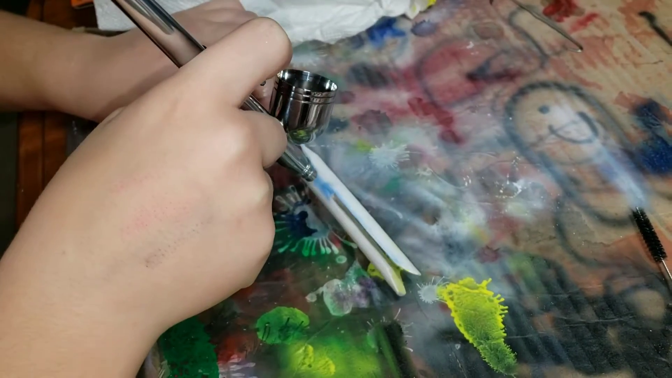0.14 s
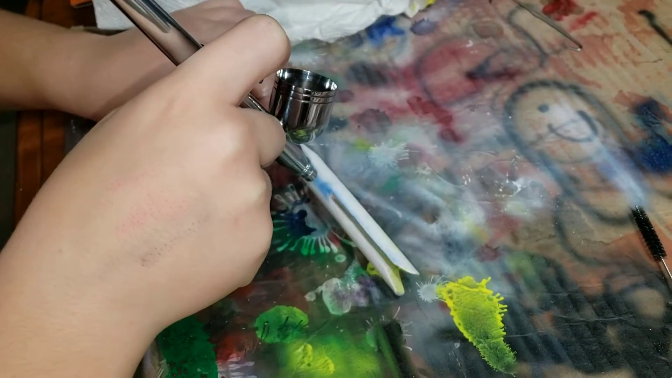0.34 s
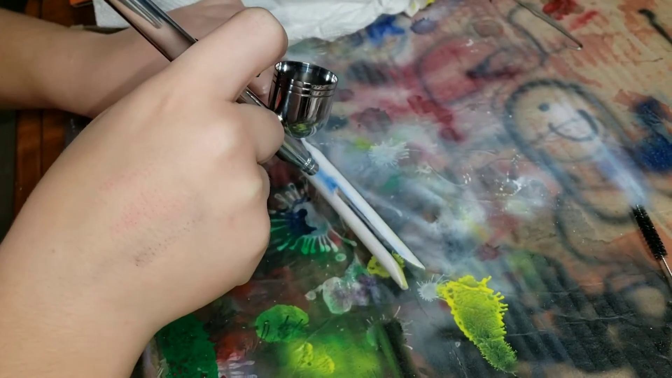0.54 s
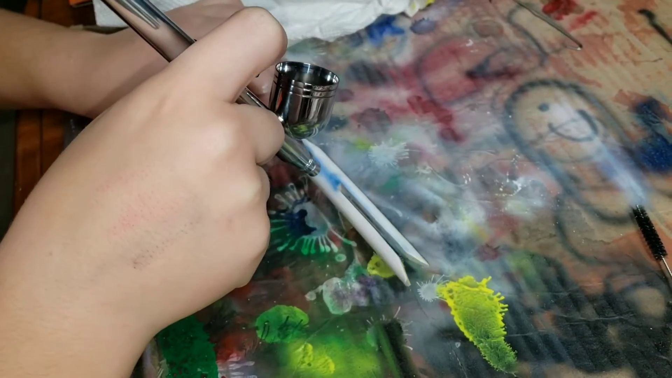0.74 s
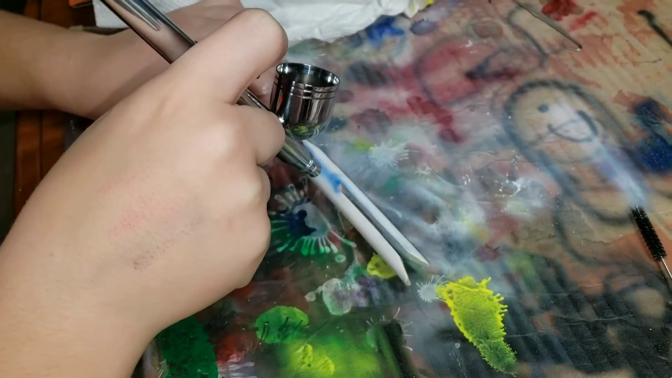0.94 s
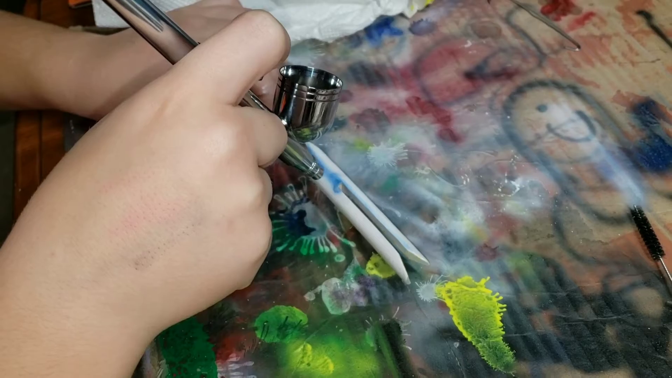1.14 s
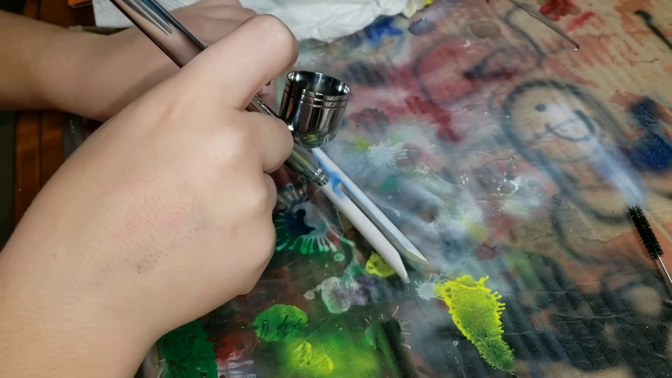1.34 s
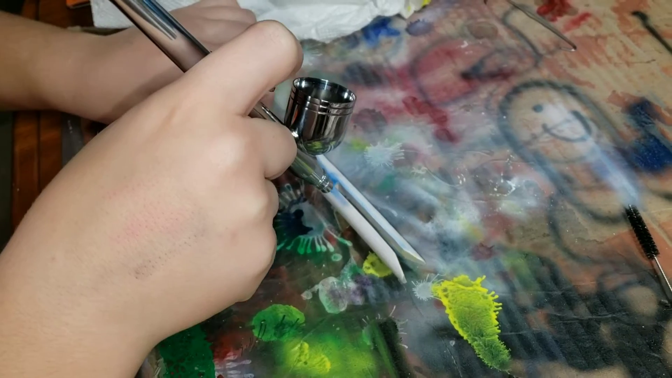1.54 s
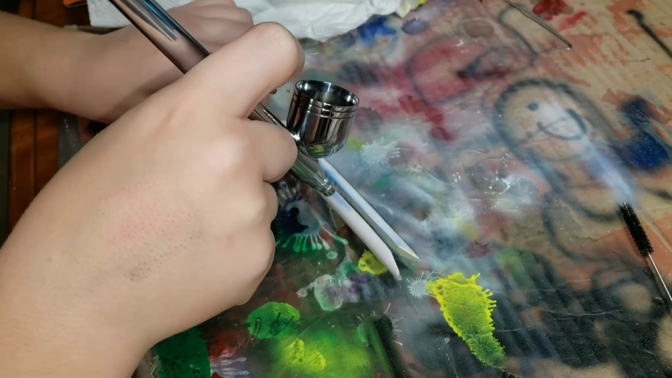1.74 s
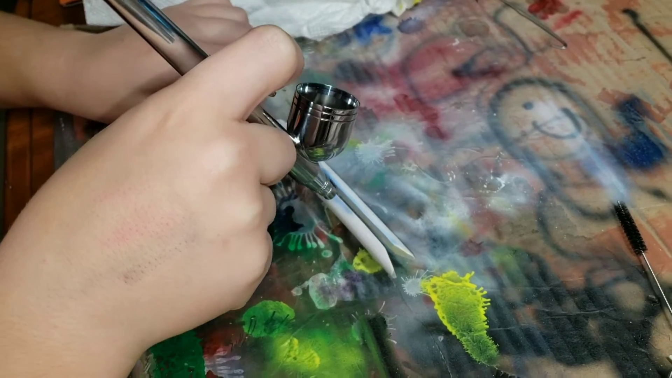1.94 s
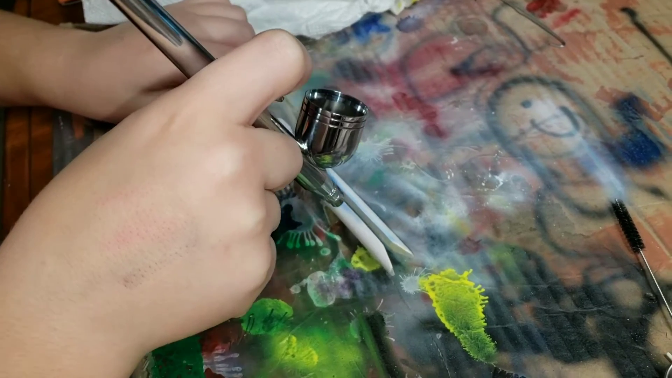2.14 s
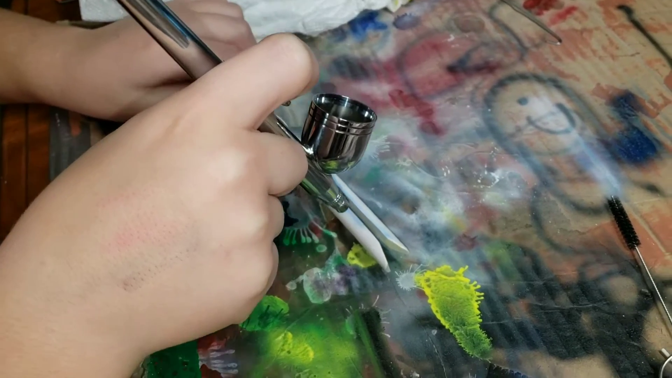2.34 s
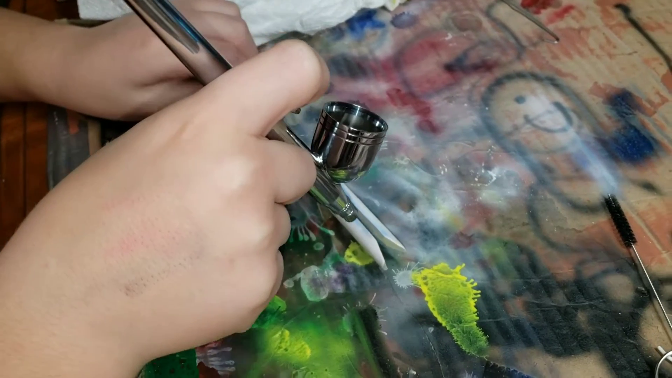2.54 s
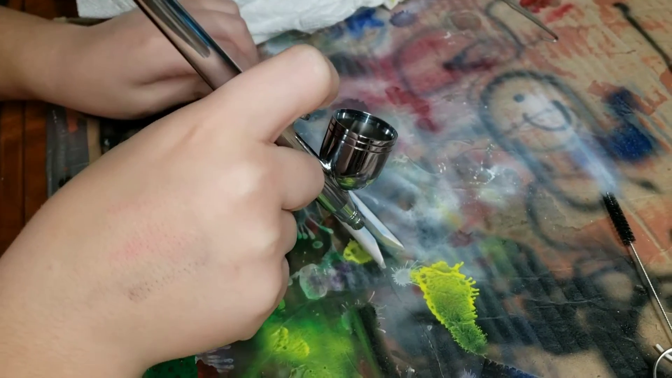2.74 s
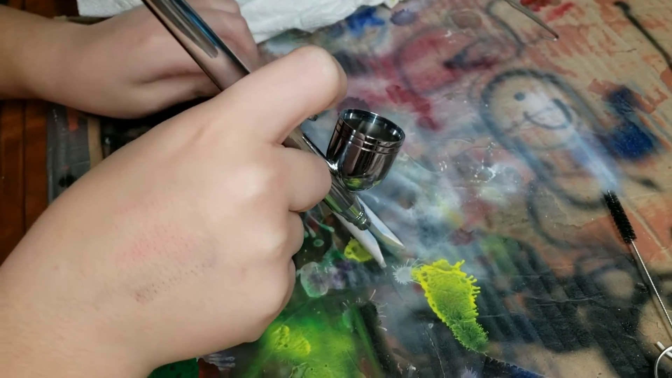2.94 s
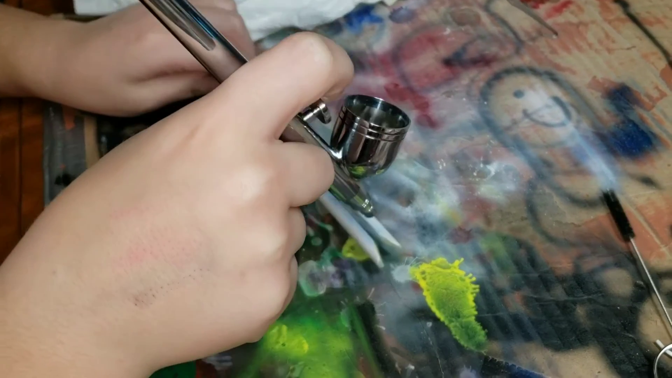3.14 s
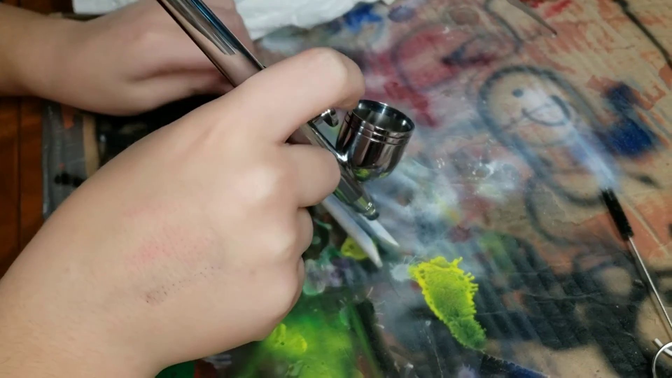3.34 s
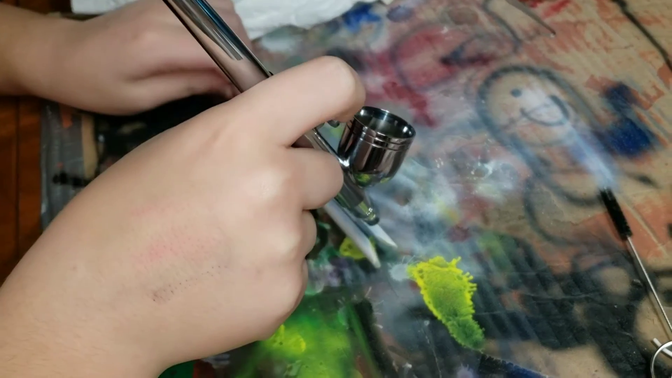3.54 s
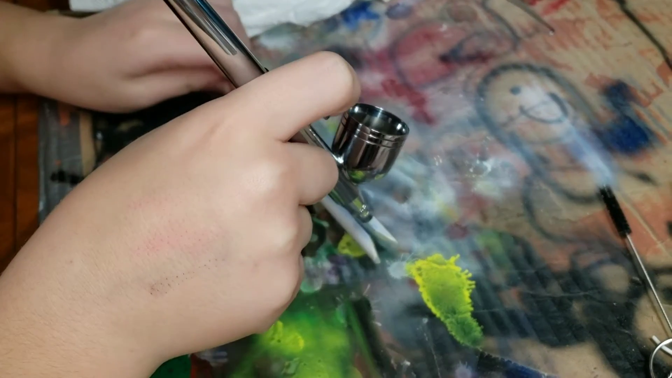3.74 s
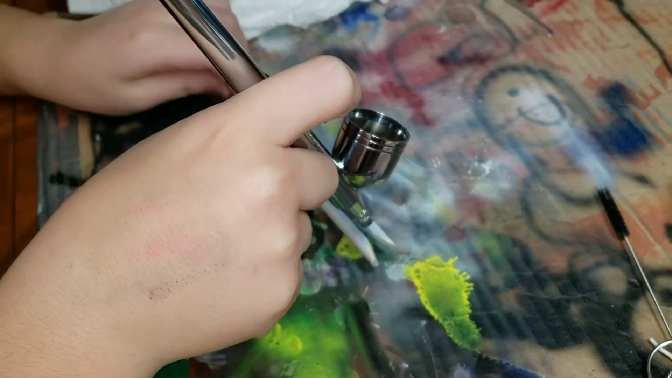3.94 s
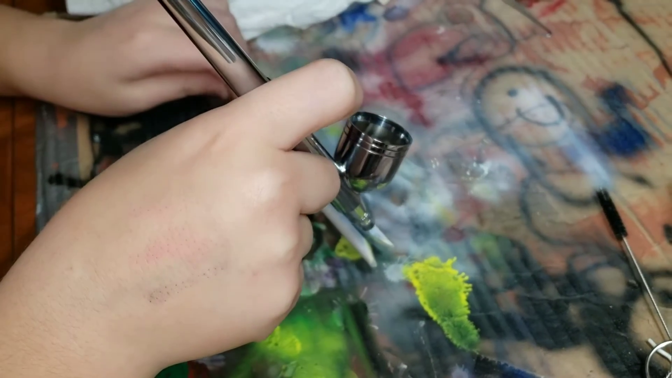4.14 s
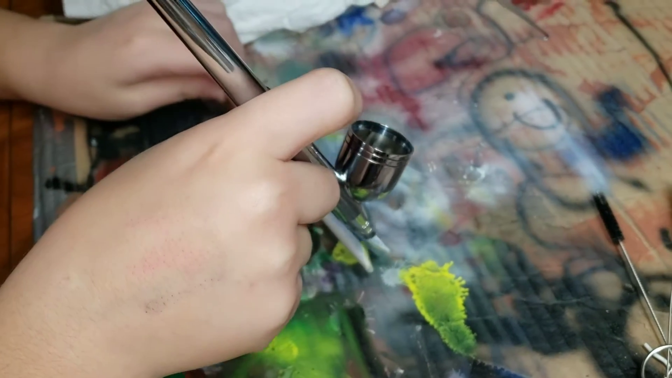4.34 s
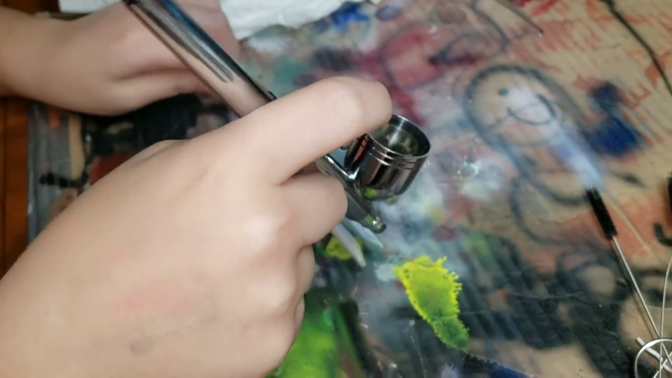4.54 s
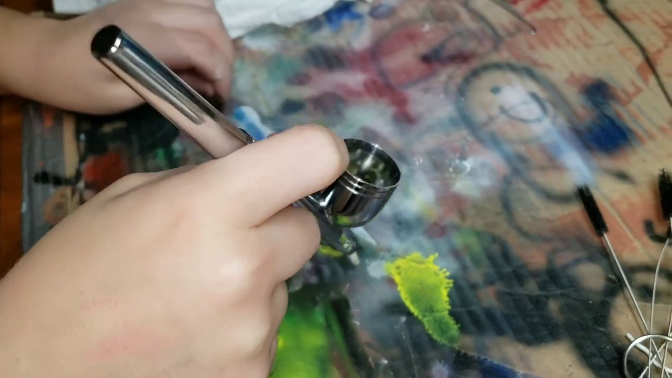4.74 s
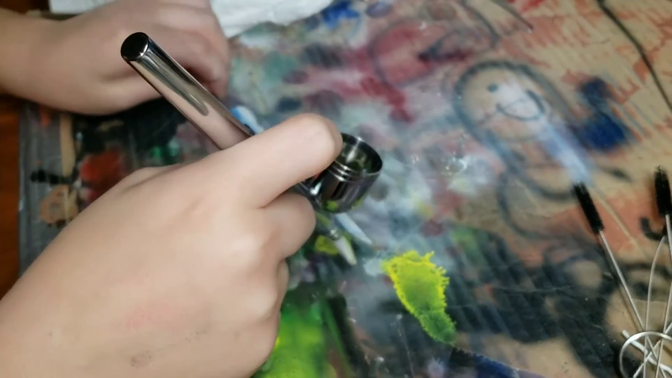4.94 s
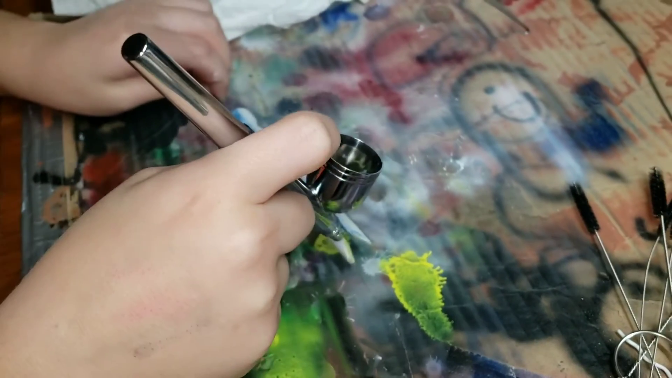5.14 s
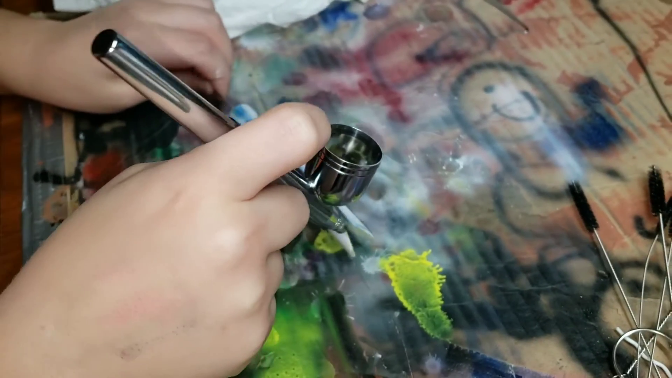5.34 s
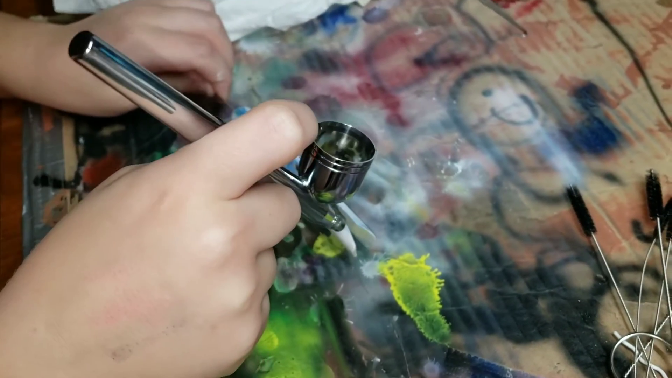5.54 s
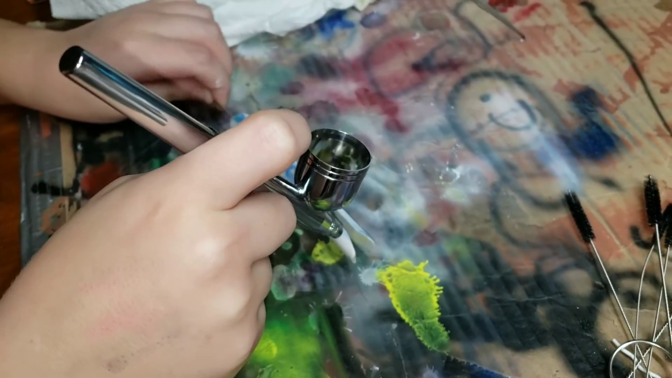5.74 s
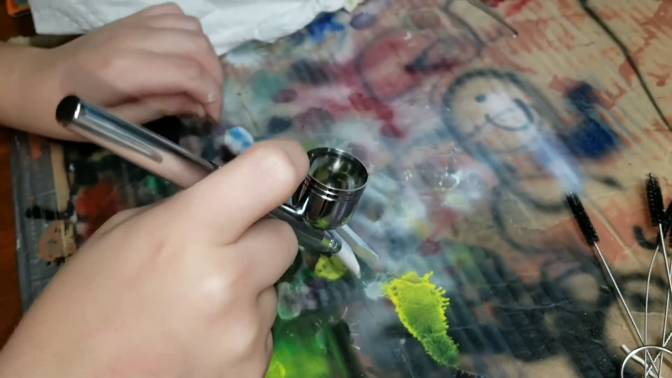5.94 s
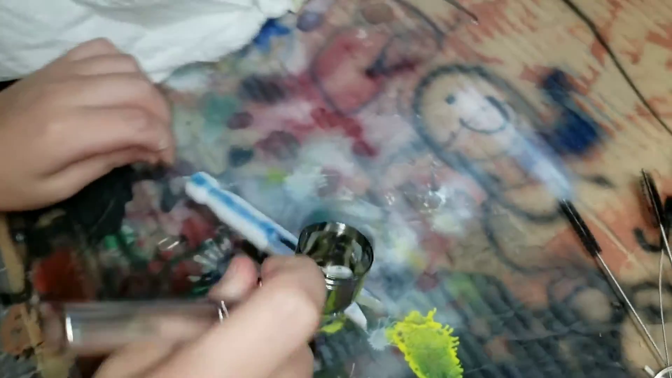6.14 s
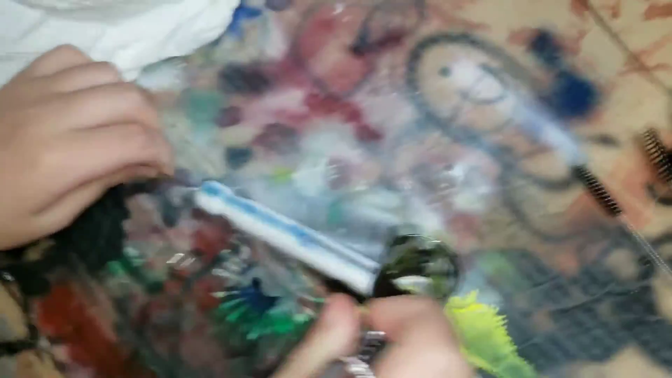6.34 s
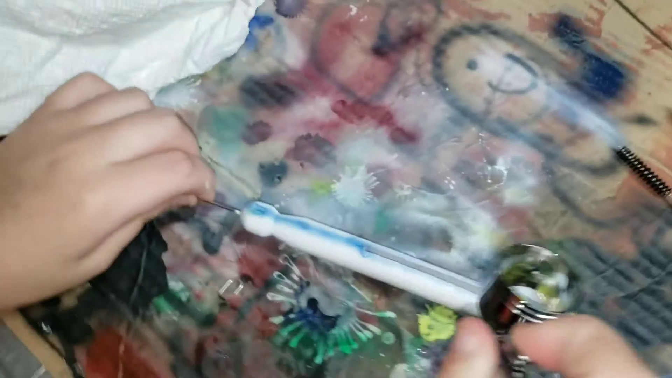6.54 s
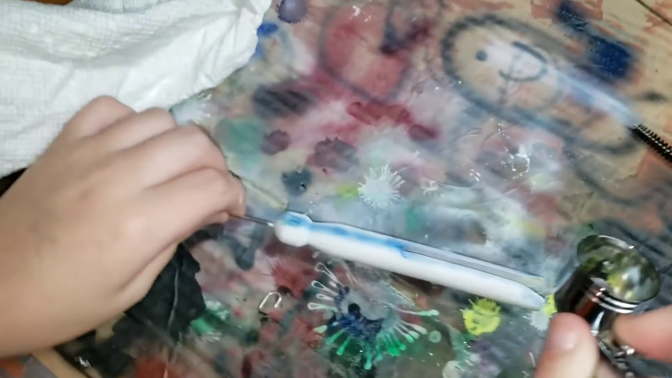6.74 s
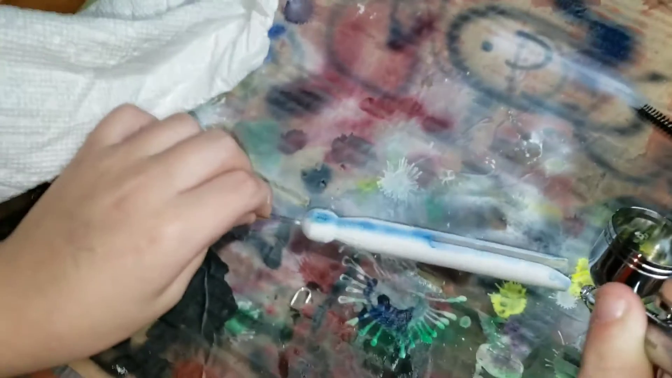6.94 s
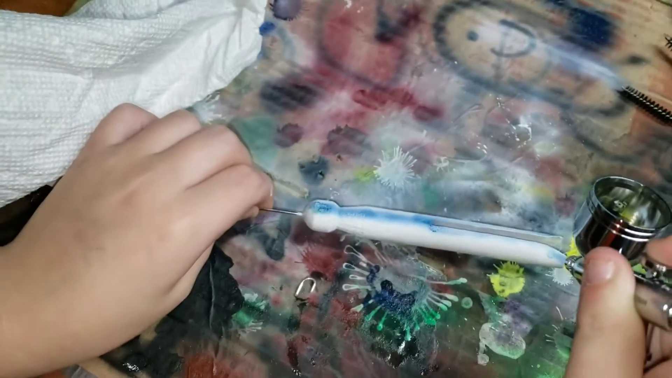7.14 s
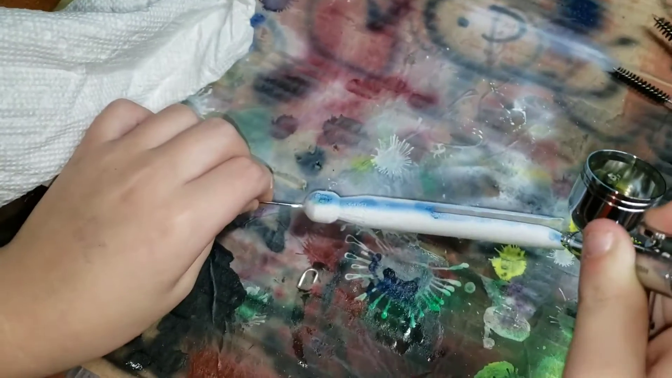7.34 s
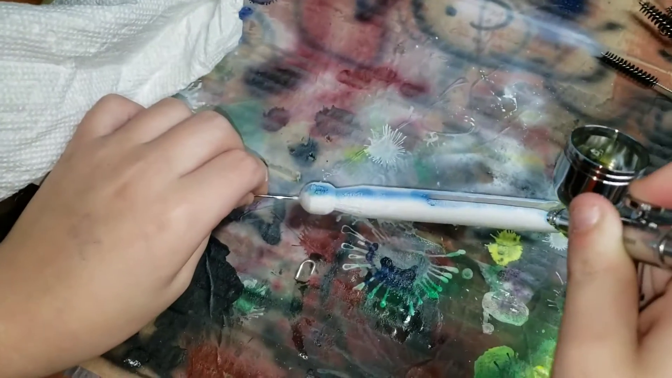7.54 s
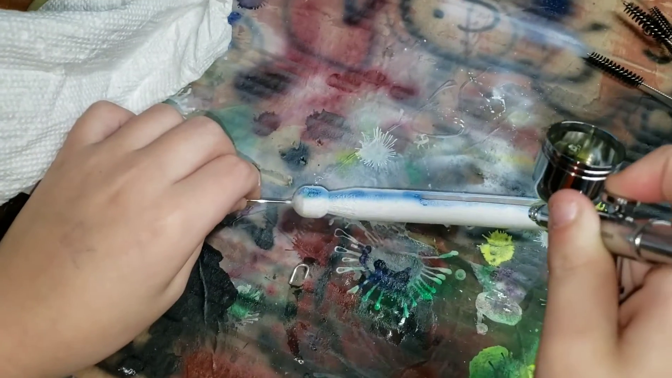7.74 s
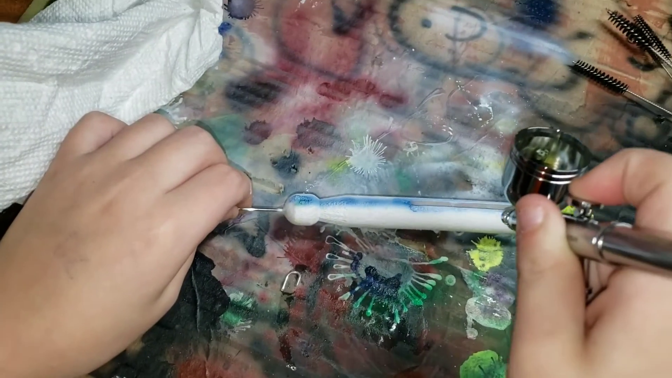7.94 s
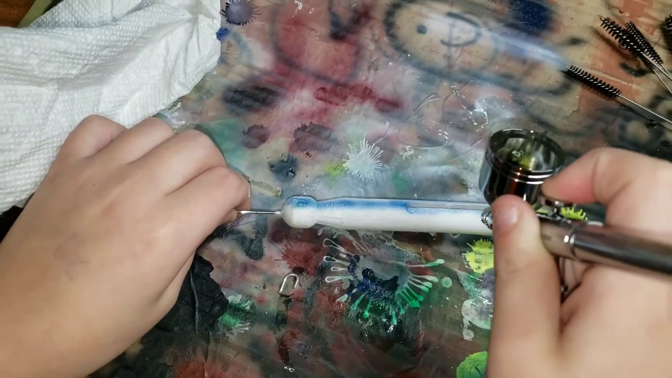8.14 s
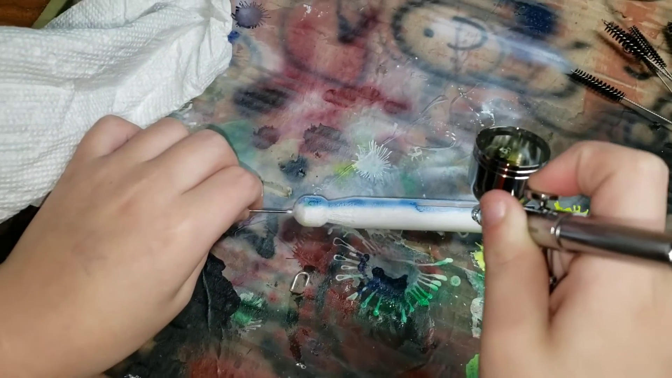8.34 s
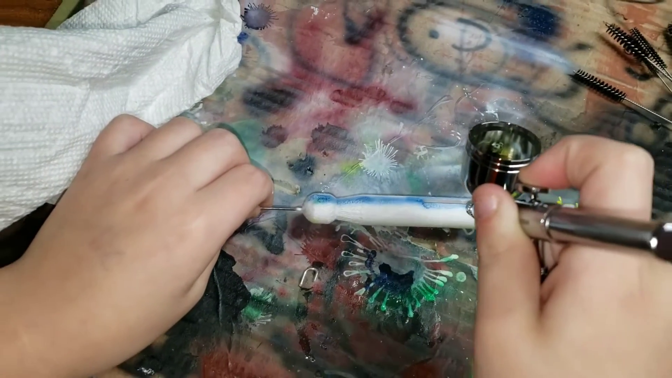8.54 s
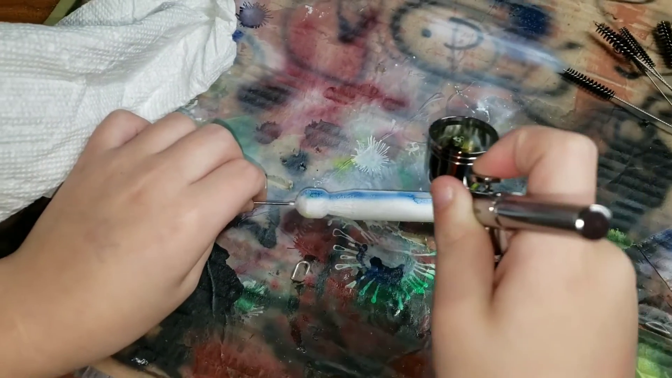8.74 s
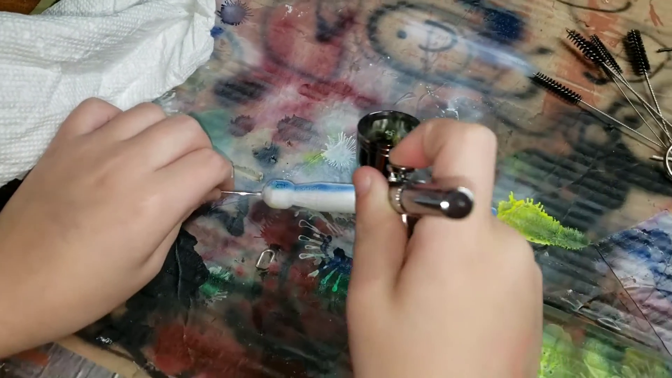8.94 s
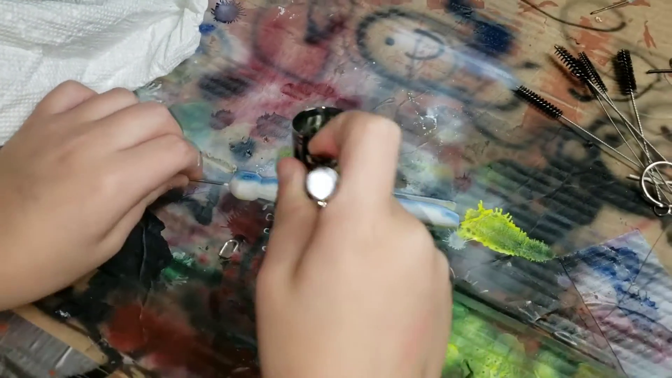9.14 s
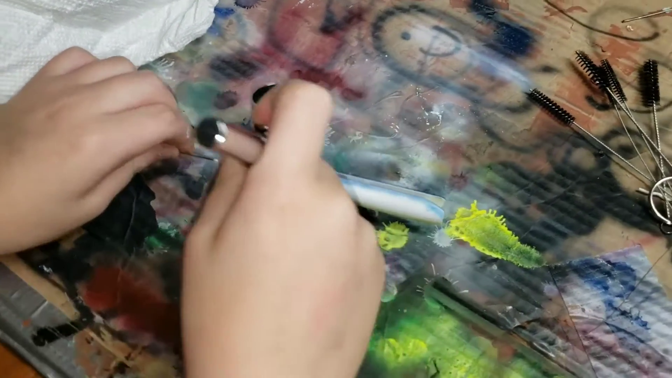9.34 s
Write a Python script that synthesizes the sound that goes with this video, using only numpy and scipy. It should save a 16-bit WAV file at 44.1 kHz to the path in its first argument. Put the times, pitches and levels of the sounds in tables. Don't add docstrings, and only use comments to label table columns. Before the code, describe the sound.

A close stereo pickup in a small, fairly dry room, the airbrush nearer the right. A small piston compressor already thrums low and fast, about 28 strokes a second, with a metallic tank ring. At 0.14 s the airbrush opens abruptly into a bright, turbulent hiss, its tone shifting as the hand moves, until 3.2 s. A faint air leak fades over the motor in the gap. A shorter, firm burst runs from 3.8 to 4.6 s. The compressor continues alone, then cuts out around 5.35 s, with light ticks near 5.4. In near quiet over deep house rumble, it coughs briefly at 5.8, with a sharp metallic clack at 5.87 and small ticks and fading hiss after. Spray returns at 6.2 s; the motor restarts about 6.7. The hiss grows harsh and whistling against the part around 8.9, then thins and shuts near 9.5.

```python
import sys
import numpy as np
from scipy import signal
from scipy.fft import rfft, irfft
from scipy.io import wavfile
from scipy.ndimage import uniform_filter1d, map_coordinates

SR = 44100
rng = np.random.default_rng(int(sys.argv[2]) if len(sys.argv) > 2 else 0)


def attenuation_scalar(level_db):
    decades = np.asarray(level_db, float) / 20
    return 10 ** decades


def dump_mix(stems):
    frames = np.atleast_2d(stems).T
    limited = np.clip(frames, -1, 1)
    pcm = np.round(limited * 32767).astype(np.int16)
    wavfile.write(sys.argv[1], SR, pcm)


N = 414540
T = np.arange(N) / SR
HZ = np.fft.rfftfreq(N, 1 / SR) + 0.00089

# valve opens in s, shuts in s, rise in dB/s, fall in dB/s, mist re jet in dB.
SPRAY_PASSES = [
    (.14, 3.18, 800, 1300, -10),
    (3.789, 4.59, 1301, 700, -17),
    (6.189, 9.5, 1801, 500, -11),
]
# time in s, left port lag in ms, hand echo in ms, table echo in ms.
NOZZLE_PLACE = [(0, 0.21, 0.62, 0.99), (.8, .15, 0.498, 0.95), (1.5, 0.14, .48, 0.9),
                (2.5, 0.19, 0.494, 1.006), (3.2, 0.14, .42, 1.1), (3.7, .17, 0.296, .817),
                (4.7, 0.18, 0.303, .876), (6.1, .45, .25, .75), (6.6, 0.22, .28, 0.96),
                (7, 0.086, .32, 1.2), (7.35, 0.057, .25, 1.03), (7.9, 0.02, .247, 1.03),
                (8.25, 0.035, 0.423, 0.947), (8.7, .02, 0.459, 0.882), (9.4, .01, .25, 0.823)]


def unit(x):
    return x / rms(x)


def rms(x):
    return np.sqrt(np.mean(x ** 2, axis=-1, keepdims=True))


def read(table, off=None):
    s, *columns = np.transpose(table)
    return [np.interp(T, s, c, off, off) for c in columns]


def colour(x, points):
    f, db = np.transpose(points)
    return irfft(rfft(x) * attenuation_scalar(np.interp(np.log(HZ), np.log(f), db)), N)


def ring(x, modes, order=1):
    gain = 0
    for f, width, db in modes:
        damping = 1j * HZ * width
        gain = gain + attenuation_scalar(db) * (damping / (f * f - HZ ** 2 + damping)) ** order
    return unit(irfft(rfft(x) * gain, N))


def walk(rate_hz):
    hold = int(SR / rate_hz)
    steps = np.repeat(rng.standard_normal(N // hold + 1), hold)
    return unit(uniform_filter1d(steps, hold)[:N])


def late(x, ms):
    return map_coordinates(x, [np.arange(N) - ms * SR / 1000], order=3, mode="wrap")


def ports(x, like, pan_db=0.):
    own = np.roll(x, 1541)
    like = np.clip(like, 0, 1)
    left = like * x + np.sqrt(1 - like ** 2) * own
    return np.array([left * attenuation_scalar(pan_db / 2), x * attenuation_scalar(-pan_db / 2)])


def ramp(start, stop, rise, fall):
    return -rise * np.maximum(start - T, 0) - fall * np.maximum(T - stop, 0)


def building():
    spectrum = [(15, -11), (28, -2), (45, -7), (70, -5), (110, -30), (16000, -120)]
    return attenuation_scalar(-78) * unit(colour(rng.standard_normal((2, N)), spectrum))


def tank_pings():
    # knock in s, level in dB.
    knocks = [
        (5.452, -52.5),
        (5.788, -55),
        (5.878, -49),
        (5.96, -47),
    ]
    out = np.zeros(N)
    for s, db in knocks:
        t = np.maximum(T - s, 0)
        envelope = (1 - np.exp(-t / 0.0015)) * np.exp(-t / 0.032)
        out += attenuation_scalar(db) * np.sin(2 * np.pi * 712 * t) * envelope
    return out


def trigger_ticks():
    # time in s, peak in dB, tail t60 in s.
    clicks = [(5.4044, -44, 0.04), (5.4131, -40, 0.04), (5.4594, -55, 0.044), (5.7591, -47, 0.04),
              (5.7947, -47, 0.04), (5.864, -21.5, 0.11), (5.9238, -35.5, 0.04), (5.9344, -41, 0.04),
              (5.9629, -41, 0.04), (5.9714, -50, 0.04), (6.0352, -50, 0.04)]
    # frequency in Hz, width in Hz, level in dB.
    metal = [(8460, 500, 13), (5750, 840, -9), (14800, 1400, -7), (11100, 2600, 7)]
    out, t = np.zeros((2, N)), np.arange(4000) / SR
    for s, db, t60 in clicks:
        decay = np.exp(-t / 0.0037) + 0.17 * np.exp(-np.log(1000) * t / max(t60, .005))
        i = int(s * SR)
        out[:, i:i + 4000] += attenuation_scalar(db + np.array([[-5.], [3.]])) * decay * rng.standard_normal((2, 4000))
    return 0.36 * ring(out, metal) * np.std(out, axis=1, keepdims=True)


def motor_levels():
    # up to speed in s, switched off in s.
    runs = [
        (-1, 5.34),
        (5.785, 5.865),
        (6.68, 10),
    ]
    left_db = [
        -17.5,
        -13,
        -12,
    ]
    # time in s, thump in dB, tank pressure 0-1.
    load = [(0, -53.5, 0.68), (.64, -53, 0.6), (1.92, -53, .55), (3.04, -51, 0.2), (3.79, -50.5, 1),
            (3.85, -54.5, 1), (4, -55, 0.75), (4.4, -56, 0.54), (4.9, -55.5, 0.92), (5.3, -55, 1.1),
            (5.82, -55, 0.64), (6.7, -50.5, 0.91), (7.87, -48.5, 0.3), (8.32, -50.5, 0.26),
            (8.9, -50.5, .15), (9.4, -54.5, 0.5)]
    # time in s, level in dB, fade in dB/s.
    vents = [
        (3.23, -52.5, 72),
        (4.632, -58.5, 63),
        (5.61, -74, 250),
        (5.88, -56, 68),
    ]
    spin_up_s, spin_down_s, head_warms_s = .045, .035, 0.14
    tank_low_db, tank_full_db = -10, 2.5
    knock_low_db, knock_full_db = -9.5, -3.5
    on = np.max([1 + ramp(a, b, 1 / spin_up_s, 1 / spin_down_s) for a, b in runs], axis=0).clip(0, 1)
    run_db, pressure = read(load)

    def dying(rise, fall, depth):
        levels = []
        for (a, b), rest in zip(runs, left_db):
            floor = np.where(T > b, depth * rest, -99)
            levels.append(np.maximum(ramp(a, b, rise, fall), floor))
        return np.max(levels, axis=0)

    tank_db = -9 + on * (tank_low_db + (tank_full_db - tank_low_db) * pressure + 9)
    warm = np.max([((T - a) / head_warms_s).clip(0, 1) * (T < b) for a, b in runs], axis=0)
    head_db = -6.5 - 14 * (1 - uniform_filter1d(warm, size=900))
    leak = [run_db - 7.5 + ramp(a, b + 0.068, 200, 95) for a, b in runs[::2]]
    bleed = [db + ramp(s, s, 140, fade) for s, db, fade in vents]
    hiss_db = np.max(leak + bleed, axis=0).clip(-87, 0)
    knock_db = run_db + knock_low_db + (knock_full_db - knock_low_db) * pressure
    knock_db = knock_db + dying(590, 230, 1.67) - 4 * (1 - warm) * on
    return on, run_db + dying(180, 80, 0.92), tank_db, head_db, hiss_db, knock_db


def compressor(open_air):
    # time in s, shaft rate in turns/s.
    shaft = [
        [(0.0, 28.47), (1.84, 28.9), (3.48, 28.69), (3.85, 29.02), (4.47, 28.38), (5.3, 28.21)],
        [(6.8, 28.74), (8.21, 28.74), (9.31, 28.92), (9.4, 28.56)],
    ]
    # multiple of shaft rate, level in dB.
    stroke = [(1, -11), (2, -8.5), (3, 1.5), (4, -2.5), (5, -0.5), (6, -7), (7, -5), (8, -10.5), (9, -7),
              (10, -12), (11, -5), (12, -25), (13, -8.5), (14, -14.5), (15, -32), (16, -9), (17, -14),
              (18, -6.5), (19, -11), (20, -8), (21, -8)]
    # frequency in Hz, width in Hz, level in dB.
    tank_modes = [(712.3, 15.5, 14.5), (653, 54, -11), (834, 52, -6.5)]
    head_modes = [(957.3, 16, 6), (857, 34, -6)]
    valve_modes = [(1595, 81, 0.5), (2024, 160, -3), (1392, 83, -14.5)]
    # frequency in Hz, level in dB per Hz.
    leak_spectrum = [(1500, -19), (2200, -4.5), (2900, -10.5), (3200, -16), (3900, -18.5), (4600, -8.5),
                     (5200, -10), (5750, -3.5), (7300, -15.5), (8400, -4.5), (9600, -8.5), (11200, -3.5),
                     (13500, -8), (15700, -9)]
    room_spectrum = [(15, -45.5), (25, -24.5), (119, -4), (389, -20.5), (515, -17), (580, -29.5),
                     (709, -20), (939, -34.5), (1100, -30), (3000, -49), (3900, -63), (6600, -120)]
    rumble_spectrum = [(15, -54.5), (25, -21), (123, -10.5), (560, -14.5), (721, -6.5), (795, -9.5),
                       (965, -15.5), (1220, -27.5), (1600, -21), (2140, -15), (2600, -38.5), (3380, -65.5),
                       (5720, -120)]
    turn = np.cumsum(read(np.vstack(shaft))[0]) / SR + .42
    on, thump_db, tank_db, head_db, hiss_db, knock_db = motor_levels()
    size = attenuation_scalar(0.29 * rng.standard_normal((400, 3))).T

    def blows(at, k):
        hits = np.diff(np.floor(turn - at), prepend=0).clip(0, 1)
        return unit(hits * size[k][np.floor(turn - at + 1).astype(int)])

    sway = [walk(9) for _ in range(7)]
    orders = 0
    for k, db in stroke:
        phase = 2 * np.pi * k * turn + .012 * k * k + 0.6 * sway[k % 5]
        orders = orders + attenuation_scalar(db + 1.0 * sway[k % 7]) * np.cos(phase)
    hum = np.sin(2 * np.pi * 120 * T)
    noise = rng.standard_normal((5, N))
    idle = (1 - on) * open_air
    low = on * (-unit(orders) + 0.89 * hum) * 0.74
    low = low + attenuation_scalar(-4.0) * on * unit(colour(noise[0], rumble_spectrum))
    low = low + (1.1 - on) * unit(colour(noise[1], room_spectrum))
    tank = on * ring(blows(0.018, 0) + 0.045 * noise[2], tank_modes)
    tank = tank + 0.36 * idle * ring(noise[2], [(730, 110, 0)], order=2)
    head = on * ring(blows(.35, 1) + 0.12 * noise[3], head_modes)
    head = head + idle * ring(noise[3], [(975, 300, 0)], order=2) * .2
    knock = on * ring(blows(.6, 2) + 0.045 * noise[3], valve_modes, order=2)
    knock = knock + idle * ring(noise[3], [(1720, 900, 0)], order=2)
    puff = 1 + 1.6 * on * np.exp(-((turn - .6) % 1) / .15)
    hiss = unit(colour(unit(puff) * attenuation_scalar(0.95 * walk(60)) * noise[4], leak_spectrum))
    hiss = hiss * attenuation_scalar(hiss_db - 3.55 * (2.5 - open_air))
    reed = ring(blows(.62, 1), [(5770, 500, 0), (4800, 400, -5), (11100, 500, -4)], order=2)
    click = on * attenuation_scalar(1.2 * walk(6)) * reed
    hiss = hiss + click * attenuation_scalar(hiss_db - 13.5)
    body = ports(low, 0.82) * attenuation_scalar(thump_db - np.array([[1.1], [-1.1]]))
    rings = tank * attenuation_scalar(tank_db + thump_db) + head * attenuation_scalar(head_db + thump_db)
    rings = colour(rings, [(300, -28), (600, -0.5), (1000, 0.5), (1400, -15.5), (3000, -63)])
    knock = knock * attenuation_scalar(knock_db + 7.5 - 3.3 * (1 - open_air))
    knock_pair = np.array([late(knock, np.full(N, .2)), knock])
    return body + ports(rings, 0.81) + knock_pair + ports(hiss, .2, pan_db=-15.0) * 1.45


def valve_gates_db():
    burst_db, burst_s = 3.5, .03
    gates = []
    for opens, shuts, rise, fall, _ in SPRAY_PASSES:
        burst = (T > opens) * burst_db * np.exp(-np.abs(T - opens) / burst_s)
        gates.append(ramp(opens, shuts, rise, fall) + burst)
    return np.array(gates)


def spraying():
    return uniform_filter1d(1. * (valve_gates_db().max(axis=0) > -42), size=220)


def jet_levels():
    # time in s, air flow in dB, nozzle near the part 0-1, nozzle turned to the phone 0-1.
    hand_moves = [
        [(.3, -39, 0.27, .32), (.73, -35.5, 0.42, 0.73), (1.38, -37.5, 0.42, 0.68), (1.54, -38, 0.38, .05),
         (1.75, -37, 0.29, 0.54), (2.63, -37, 0.41, 0.72), (2.9, -37, 0.37, 0.66), (3.05, -43, .25, .52),
         (3.17, -34, 0.13, 0.2)],
        [(3.8, -32, .14, 0.4), (3.9, -35, 0.31, 0.83), (4.35, -36, 0.28, 0.7), (4.53, -36, .23, 0.46),
         (4.59, -49.5, 0.14, .7)],
        [(6.25, -37.5, 0.28, 0.4), (6.85, -34, 0.09, 0.32), (7.01, -39, 0.1, 0.67), (7.1, -35, 0.17, 0.54),
         (7.67, -33, .45, 0.63), (8.62, -34, 0.51, .7), (8.88, -34, 0.87, 0.5), (9.07, -41, 1, 1),
         (9.25, -45, .43, 0.7)],
    ]
    splash_far_db, splash_near_db = -2, 20
    gates = valve_gates_db()
    which, gate = gates.argmax(axis=0), gates.max(axis=0)
    flow_db, near, turned = read(np.vstack(hand_moves))
    low_db = np.array(SPRAY_PASSES)[which, 4] + 0.24 * (-36 - flow_db) + 3 * near
    splash_db = splash_far_db + (splash_near_db - splash_far_db) * near
    pan_db = -11 + 11.5 * read(NOZZLE_PLACE)[0].clip(0, .18)
    return flow_db + gate.clip(-60, 20), low_db, splash_db, 16 * turned, pan_db, which


def airbrush(on):
    # cup echo after table in ms, left table echo share, left cup echo in ms.
    grip = [
        (0.687, 1.02, 1.6),
        (0.86, 1.4, 1.3),
        (0.377, 0.596, 0.81),
    ]
    # frequency in Hz, left minus right in dB.
    far_port = [(2500, 1.5), (4000, -6), (5400, -5), (6250, -9), (7300, 7), (8100, -2.5), (8700, -10.5),
                (9900, -19), (11000, 4), (14000, -2.5)]
    # frequency in Hz, level in dB per Hz.
    jet_spectrum = [(1120, -58), (1900, -25.5), (2710, -16.5), (3230, -15), (5340, 1.5), (5940, -0.5),
                    (7470, -12), (8240, -3), (9240, -8.5), (11500, 2), (13400, 0.5), (15200, 7),
                    (15700, 1.5)]
    body_db, low_db, splash_db, top_db, pan_db, which = jet_levels()
    lag, hand, table = read(NOZZLE_PLACE)
    cup_after, far_share, far_cup = np.array(grip)[which].T
    cup, far_table = table + cup_after, table * far_share
    eddies = attenuation_scalar(0.45 * walk(700) + 0.5 * walk(90) + .5 * walk(25))
    jet, *diffuse = eddies * rng.standard_normal((5, N))
    right = jet + .4 * late(jet, hand) + .35 * late(jet, table) + .25 * late(jet, cup)
    left = late(jet, lag) + .5 * late(jet, lag + far_table) + .4 * late(jet, lag + far_cup)
    scatter = colour(np.array(diffuse[:2]), [(3000, 14.8), (8000, 3), (11000, 5.1), (16000, 4.9)])
    pair = unit(np.array([left, right])) + np.array([[.65], [.36]]) * scatter
    pair = np.array([colour(pair[0], far_port), pair[1]])
    pair = rfft(colour(pair, jet_spectrum))
    edge = [1 / (1 + (HZ / hz) ** 12) for hz in (1965.0, 3730.0, 7500.0, 12640.0)] + [1]
    free_db = np.minimum(splash_db, 7.)
    bands = ((low_db + 1, 3.1), (0, -1.5), (free_db, -3.6), (top_db, .2))
    out = 0
    for k, (rel_db, shade_db) in enumerate(bands):
        far = attenuation_scalar(pan_db + shade_db)
        gain = 2 * attenuation_scalar(body_db + rel_db + 0.36 * walk(12)) / np.sqrt(1 + far ** 2)
        band = unit(irfft(pair * (edge[k + 1] - edge[k]), N))
        out = out + band * gain * np.array([far, np.ones(N)])
    excess = np.sqrt(attenuation_scalar(2 * splash_db) - attenuation_scalar(2 * free_db) + 1e-9) * attenuation_scalar(body_db)
    whistle = [(10500, 3070, 7.5), (9150, 1100, -11.5), (11670, 1200, -4.0)]
    strike = ring(attenuation_scalar(0.48 * walk(400)) * right, whistle, order=2)
    out = out + 1.19 * excess * ports(strike, 0.29, pan_db=-26.0) * attenuation_scalar(-10.0)
    draught = unit(colour(np.array(diffuse[2:]), [(60, -19), (250, -9.0), (600, -6.0), (1400, 1),
                                                  (2100, -1.5), (2600, -47), (16000, -87)]))
    out = (out + draught * attenuation_scalar(body_db + low_db - 6.5)) * on
    tail = rng.standard_normal((2, 9000)) * np.exp(-np.arange(9000) / SR / 0.024)
    return out + attenuation_scalar(-40.5) * signal.fftconvolve(out.mean(axis=0)[None], tail, axes=1)[:, :N]


def scene():
    on = spraying()
    return building() + tank_pings() + trigger_ticks() + compressor(1 - on) + airbrush(on)


def band_limit(x):
    return signal.sosfilt(signal.butter(12, 17100, fs=SR, output="sos"), x)


def record(dry):
    treble = signal.sosfiltfilt(signal.butter(4, 2300, "high", fs=SR, output="sos"), dry)
    level_db = 10 * np.log10(uniform_filter1d(np.mean(treble ** 2, axis=0), size=900) + 1e-14)
    gated = dry - treble * (1 - attenuation_scalar(0.6 * np.minimum(level_db + 73, 0)))
    top_cut = signal.ellip(8, .2, 50, 15720, fs=SR, output="sos")
    return band_limit(signal.sosfiltfilt(top_cut, gated))


dry = scene()
out = record(dry)
dump_mix(out)
```